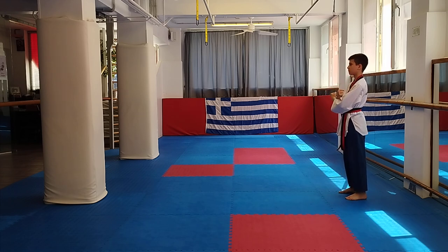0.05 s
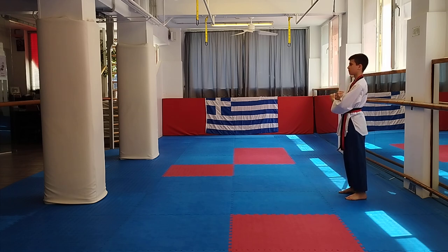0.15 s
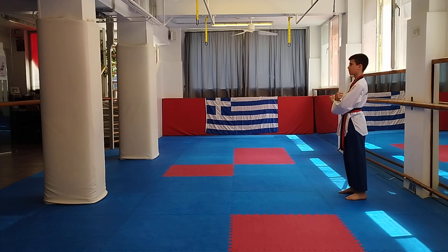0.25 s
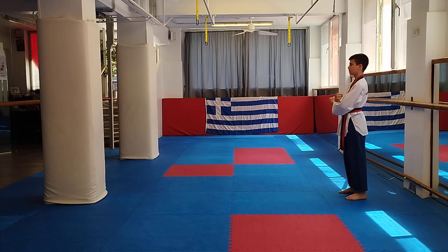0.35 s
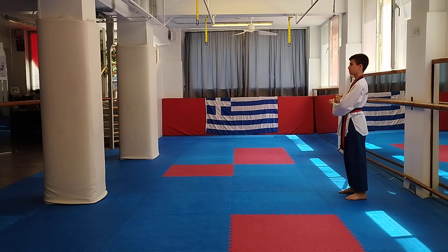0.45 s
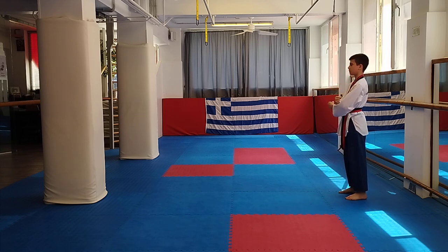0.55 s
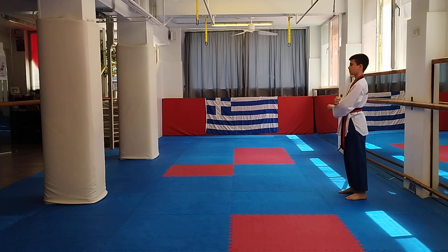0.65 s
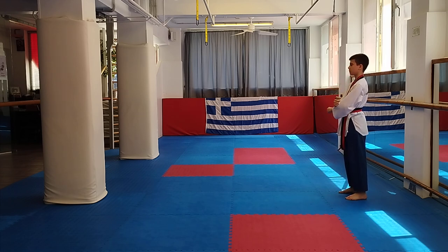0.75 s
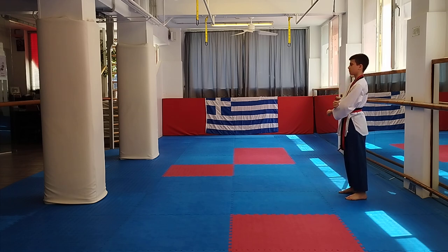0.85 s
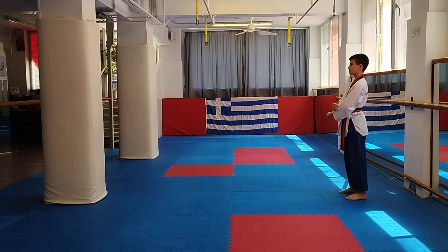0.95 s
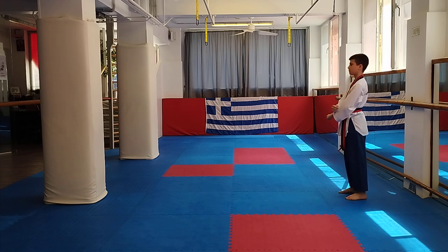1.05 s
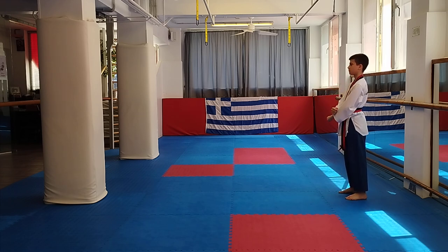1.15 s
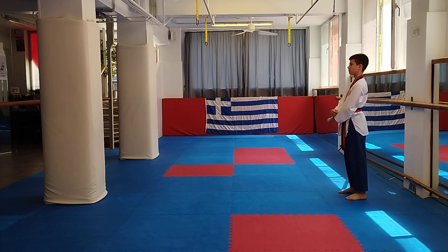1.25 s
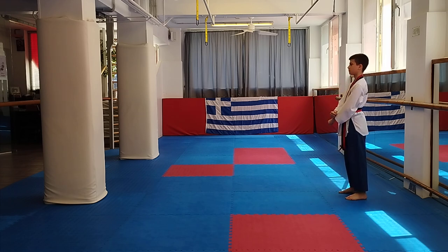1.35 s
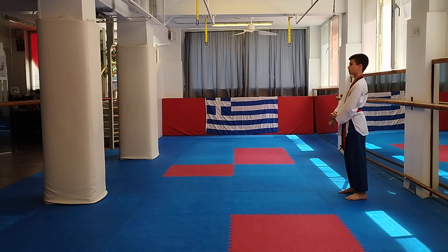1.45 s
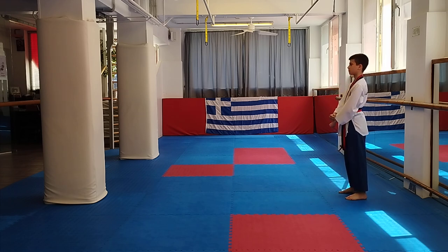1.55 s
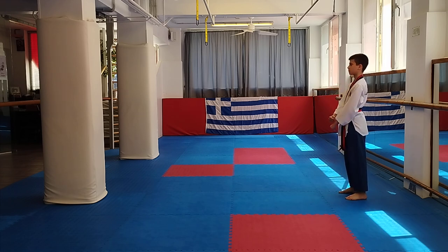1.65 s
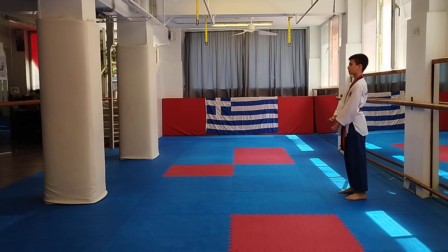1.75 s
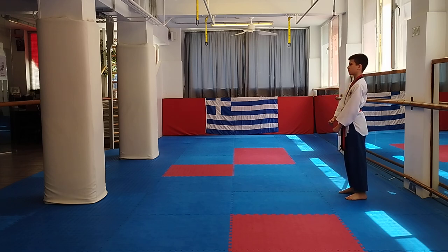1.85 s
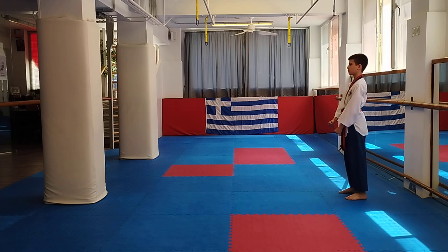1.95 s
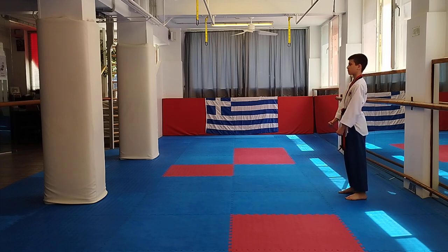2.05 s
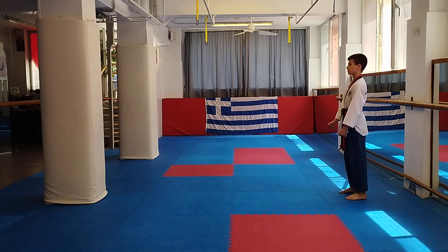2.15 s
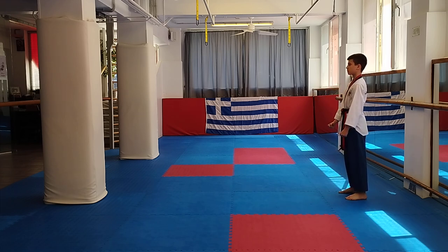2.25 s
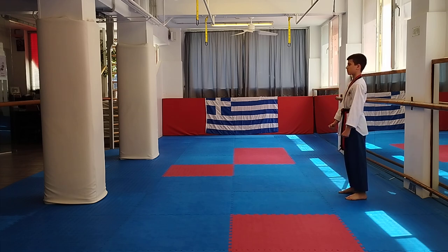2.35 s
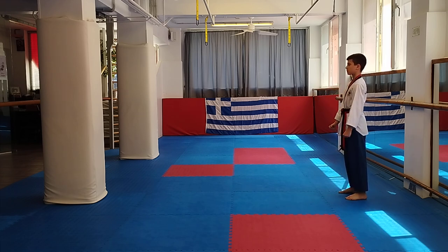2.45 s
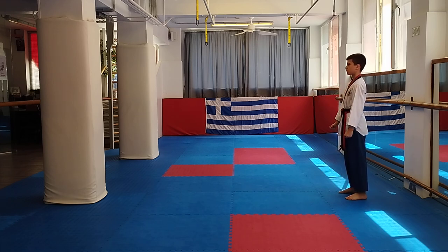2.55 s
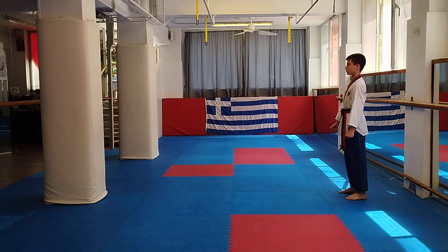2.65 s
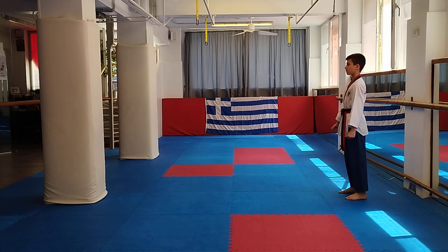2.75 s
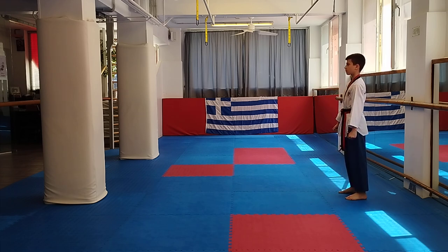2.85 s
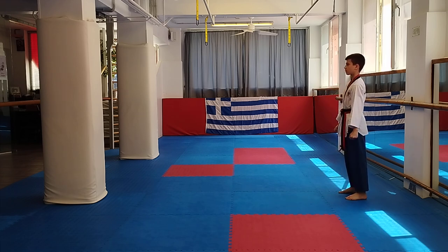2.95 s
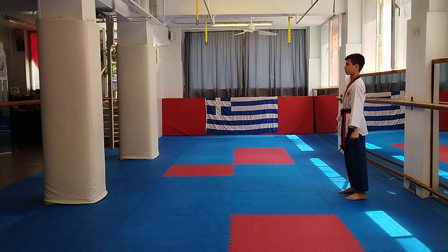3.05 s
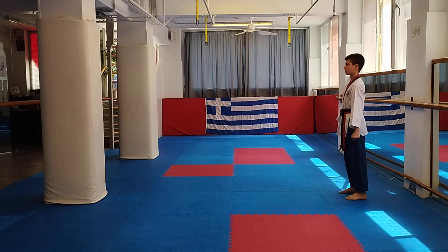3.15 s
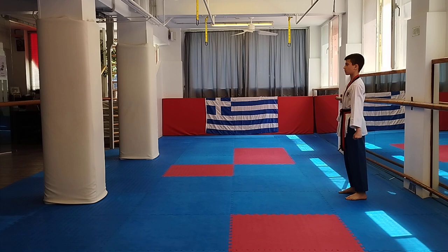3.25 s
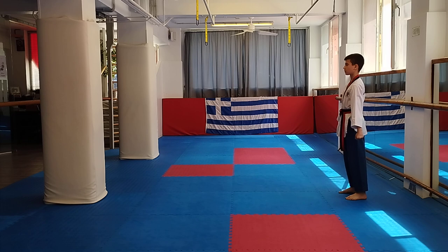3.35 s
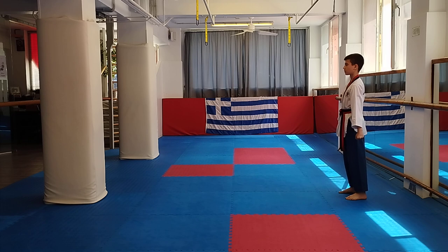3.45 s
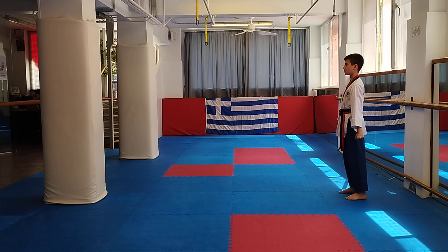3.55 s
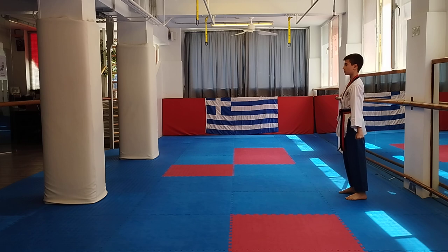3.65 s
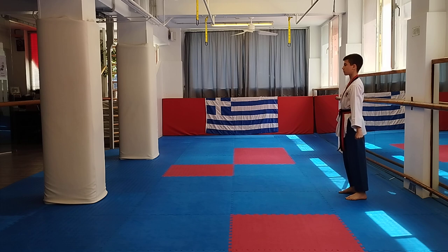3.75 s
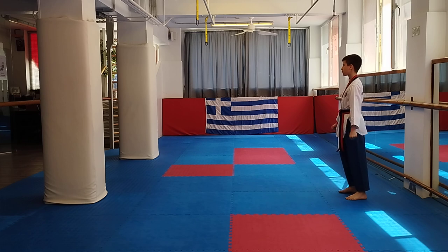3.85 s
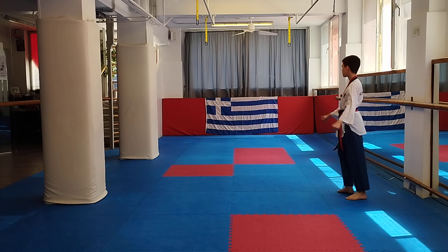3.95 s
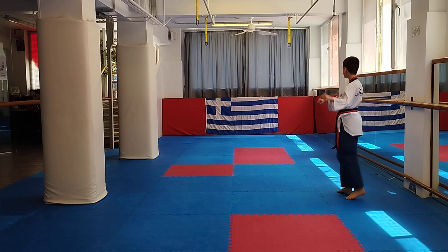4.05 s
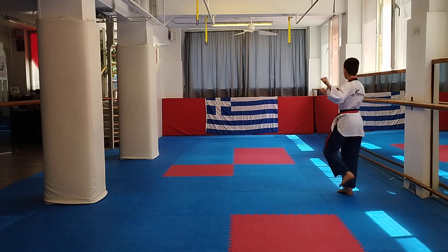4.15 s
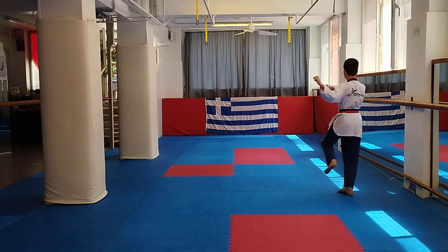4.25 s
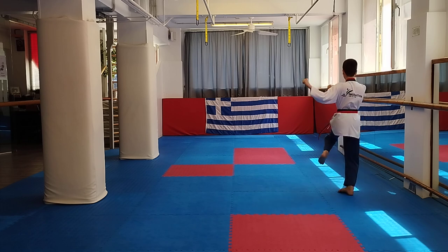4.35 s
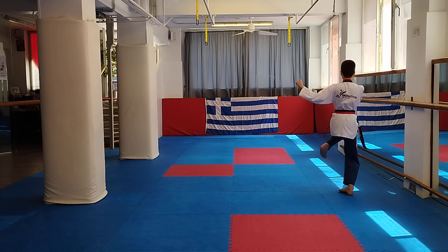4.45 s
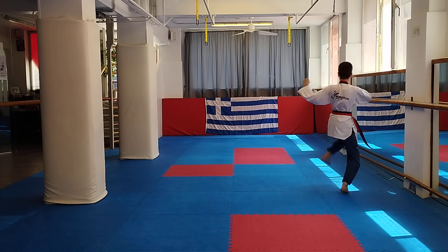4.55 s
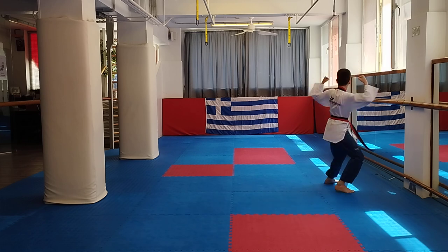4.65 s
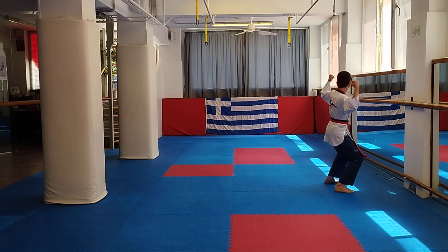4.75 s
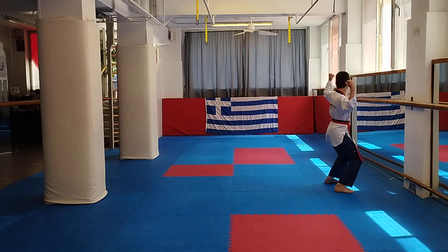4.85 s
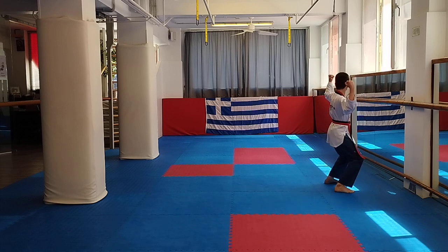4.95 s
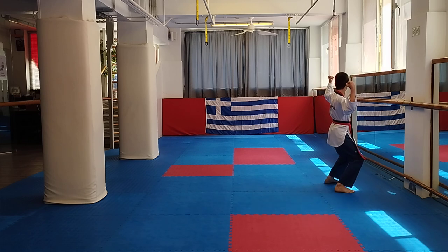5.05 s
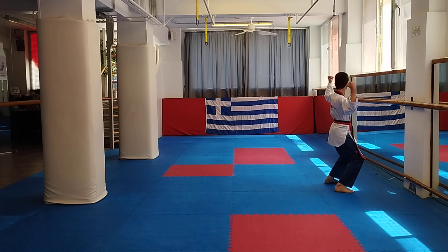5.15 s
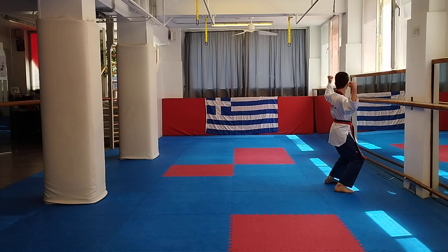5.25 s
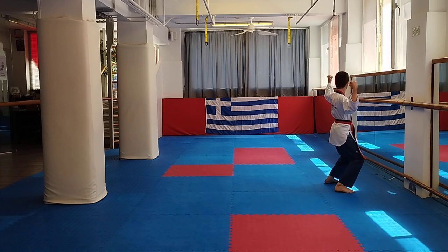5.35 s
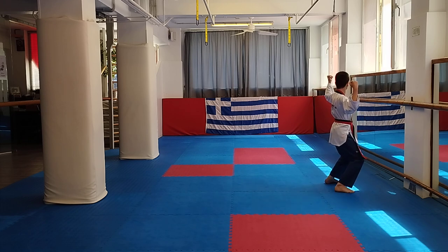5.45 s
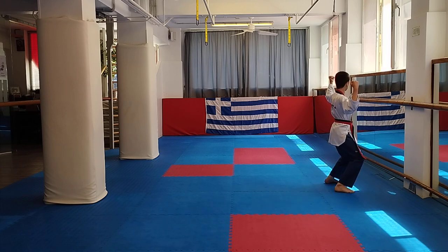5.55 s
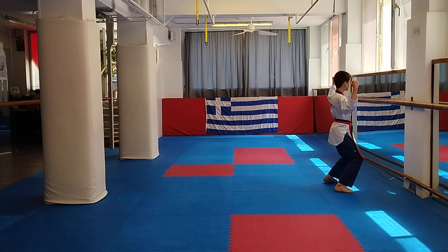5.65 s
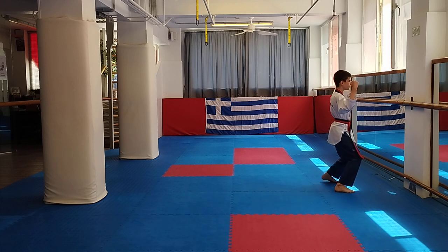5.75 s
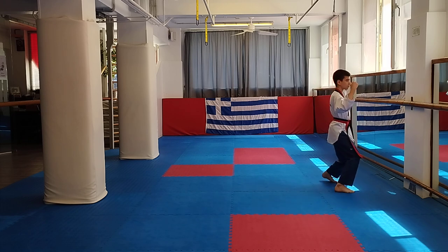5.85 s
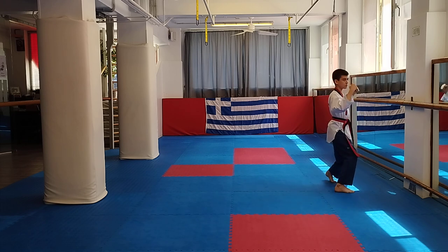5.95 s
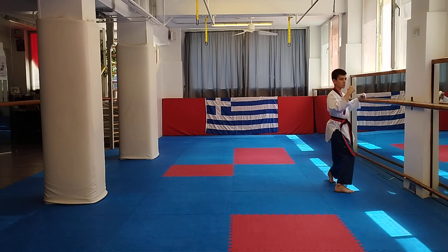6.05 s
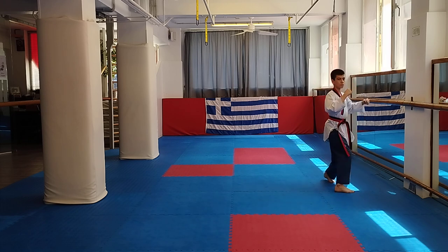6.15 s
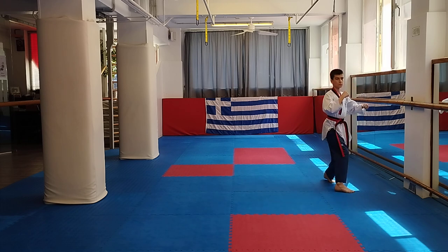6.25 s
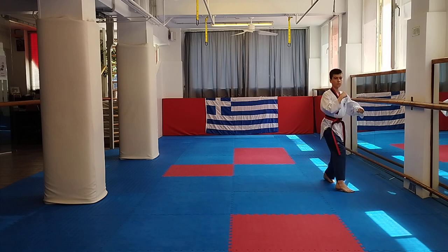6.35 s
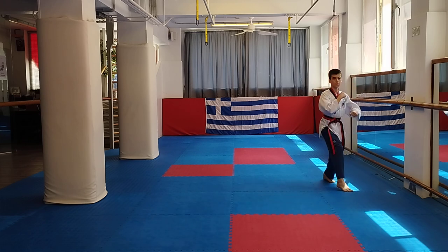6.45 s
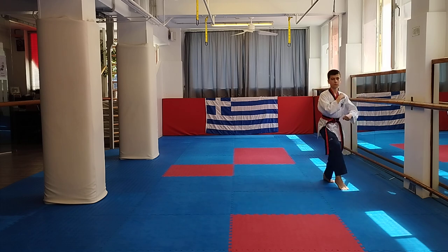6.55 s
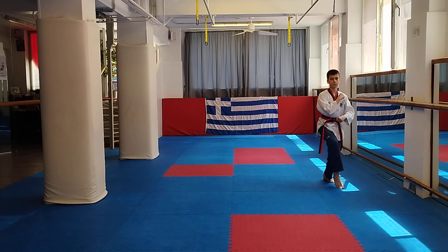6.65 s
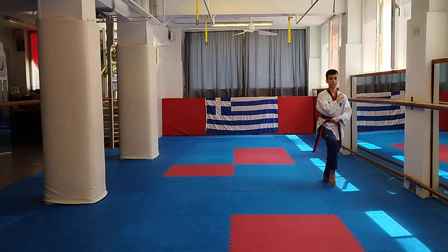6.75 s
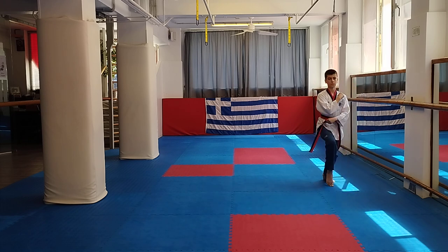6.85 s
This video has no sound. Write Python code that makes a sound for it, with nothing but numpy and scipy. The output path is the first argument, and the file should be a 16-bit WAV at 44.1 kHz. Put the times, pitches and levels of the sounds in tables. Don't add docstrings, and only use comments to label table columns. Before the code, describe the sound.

One hard barefoot stamp cracks and booms on training hall mats, over the low swelling rumble of a heavy vehicle passing outside.

```python
import sys
import numpy as np
from scipy import signal
from scipy.fft import rfft, irfft, next_fast_len
from scipy.io import wavfile
from scipy.ndimage import uniform_filter1d, map_coordinates

SR = 44100
rng = np.random.default_rng(int(sys.argv[2]) if len(sys.argv) > 2 else 0)


def gain_from_decibels(decibels):
    exponent = np.asarray(decibels, float) / 20
    return 10 ** exponent


def generate_wav(signal):
    frames = np.transpose(np.atleast_2d(signal))
    scaled = np.clip(frames, -1, 1) * 32767
    pcm = np.round(scaled).astype(np.int16)
    wavfile.write(sys.argv[1], SR, pcm)


N = 304157

# (frequency [Hz], left-right correlation [-1..1])
PORT_LIKENESS = [(30, 1), (60, 0.78), (130, 1), (290, 0.88), (640, 0.34), (1300, -0.33), (2400, 0.14),
                 (4000, -0.034)]


def unit(x):
    return x / np.sqrt(np.mean(x ** 2) + 1e-20)


def along(points, hz):
    f, v = np.transpose(points)
    return np.interp(np.log(hz + 1), np.log(f + 1), v)


def curves(rows):
    s, *cols = np.transpose(rows)
    return [np.interp(np.arange(N) / SR, s, c) for c in cols]


def wobble(rate_hz):
    knots = rng.standard_normal(int(N * rate_hz / SR) + 4)
    return map_coordinates(knots, [np.arange(N) * rate_hz / SR])


def fade(start_s, end_s, soft_s):
    t = np.arange(N) / SR
    return np.clip(np.minimum(t - start_s, end_s - t) / soft_s + 1, 0, 1) ** 2


def swells(rows):
    t = np.arange(N) / SR
    power = np.zeros(N)
    for start_s, db, rise_s, hold_s, t60_s in rows:
        decay_s = np.maximum(t - start_s - rise_s - hold_s, 0)
        rise = np.clip((t - start_s) / rise_s, 0, 1)
        power += (gain_from_decibels(db - 60 * decay_s / t60_s) * rise) ** 2
    return np.sqrt(power)


def filtered(x, response):
    m = next_fast_len(x.shape[-1] + 8192)
    return irfft(rfft(x, m) * response(np.fft.rfftfreq(m, 1 / SR)), m)[..., :x.shape[-1]]


def port_angle(hz):
    return np.arccos(np.clip(along(PORT_LIKENESS, hz), -1, 1)) / 2


def diffuse(pair):
    mid, side = filtered(pair, lambda hz: np.array([np.cos(port_angle(hz)), np.sin(port_angle(hz))]))
    return np.array([mid + side, mid - side])


def rush(spectrum, patchy_db):
    z = signal.stft(rng.standard_normal((2, N)), nperseg=512)[2]
    patches = uniform_filter1d(rng.standard_normal(z.shape[1:]), size=5, axis=0)
    patches = uniform_filter1d(patches, size=16, axis=1)
    pair = signal.istft(z * gain_from_decibels(patchy_db * unit(patches)), nperseg=512)[1][:, :N]
    both = diffuse(filtered(pair, lambda hz: gain_from_decibels(along(spectrum, hz))))
    return both / np.std(both.mean(0))


def line(hz, db, smear):
    gap = port_angle(np.mean(hz)) * np.sign(rng.normal())
    phase = 2 * np.pi * np.cumsum(hz * np.ones(N)) / SR
    phase = phase + smear * wobble(3) + rng.uniform(0, 7.6)
    return gain_from_decibels(db + 1.5) * np.sin(phase + np.array([[gap], [-gap]]))


def causal(spectrum):
    cepstrum = irfft(np.log(gain_from_decibels(along(spectrum, np.fft.rfftfreq(8192, 1 / SR))) + 1e-6))
    cepstrum[1:4096] *= 2
    cepstrum[4097:] = 0
    h = irfft(np.exp(rfft(cepstrum)))
    return h / np.linalg.norm(h)


def hall(x, early_db):
    # (frequency [Hz], t60 [s])
    hall_t60 = [(60, .6), (200, .62), (500, .8), (1500, 1.2), (4000, 1.05), (8000, .75), (13000, .55)]
    n = 3 * SR // 2
    hz, t, z = signal.stft(rng.standard_normal((2, n)), SR, nperseg=256)
    decay = gain_from_decibels(-60 * t / along(hall_t60, hz)[:, None])
    tail = diffuse(signal.istft(z * decay, SR, nperseg=256)[1])[:, :n]
    tail *= 1 - np.exp(-np.arange(tail.shape[1]) / SR / 0.001)
    tail /= np.linalg.norm(tail[0])
    tail[:, 0] = gain_from_decibels(early_db)
    return signal.fftconvolve(x[None], tail, axes=1)[:, :n]


def floor_ring(t, thud_db):
    # (frequency [Hz], level [dB], t60 [s])
    floor_modes = [(40.3, -10, 1), (78.6, -13, .6), (124.6, -16.5, 0.48), (156.9, -1, 0.55),
                   (202, -1.5, 0.56), (235.4, -5, 0.9), (280, -4.5, .9), (359, -11, 0.56), (420, -9, 0.46),
                   (443, -13.5, 0.75), (492, -7.5, 0.49), (516, -1, 0.36), (612, -8, .3), (860, -13.5, .08)]
    ring = np.zeros((2, len(t)))
    onset = 1 - np.exp(-t / 0.00045)
    for hz, db, t60_s in floor_modes:
        phase = rng.uniform(0, 7) + hz / 900 * rng.normal() * np.array([[.5], [-.5]])
        ring += gain_from_decibels(thud_db + db - 6.0 - 60 * t / t60_s) * np.sin(2 * np.pi * hz * t + phase) * onset
    return ring


def stamp():
    # (time [s], thud level [dB], slap level [dB])
    blows = [
        (4.7112, -21.5, -33.5),
        (4.717, -18, -25),
        (4.72, -13, -24),
        (4.731, -21, -33.5),
        (4.750, -19, -57),
        (4.783, -16.5, -55),
    ]
    # (frequency [Hz], level [dB/Hz])
    thud_colour = [(18, -49), (30, -17.5), (80, -1), (118, 0), (158, -3), (203, -1.5), (320, -13.5),
                   (430, -1), (540, -5), (650, -15), (850, -17), (1050, -21), (1400, -40), (2500, -120)]
    # (frequency [Hz], level [dB/Hz])
    slap_colour = [(500, -25), (800, -7.5), (1100, -10.5), (1500, -13.5), (2000, -13), (3000, -17.5),
                   (4800, -18.5), (6800, -23.5), (8000, -34), (10800, -36), (12500, -33), (15600, -35)]
    out, t = np.zeros((2, N)), np.arange(3 * SR // 2) / SR
    for s, thud_db, slap_db in blows:
        blow = -gain_from_decibels(thud_db + 30.0) * hall(causal(thud_colour), early_db=-6.5)
        blow += gain_from_decibels(slap_db + 26.5) * hall(causal(slap_colour), early_db=-37.5)
        crack = gain_from_decibels(slap_db + 3.5 - 60 * t[:900] / 0.014) * rng.standard_normal((2, 900))
        blow[:, :900] += signal.fftconvolve(crack, causal(slap_colour)[None], axes=1)[:, :900]
        blow += floor_ring(t, thud_db)
        out[:, round(s * SR):][:, :len(t)] += blow
    out[:, round(4.718 * SR):][:, :600] += sole_squeak(t[:600])
    return out


def sole_squeak(t):
    return gain_from_decibels(-21.5 - 60 * t / 0.021) * np.sin(2 * np.pi * 4500 * t) * (1 - np.exp(-t / 0.0012))


def swish():
    # (start [s], level [dB], rise [s], hold [s], t60 [s])
    strokes = [
        (0.284, -81.5, 0.009, 0.0069, .15),
        (3.396, -81, 0.14, 0.33, .6),
        (3.898, -82, 0.015, 0.036, 0.24),
        (4.105, -73.5, 0.032, 0.037, .3),
        (4.596, -75, .04, 0.085, 0.43),
        (5.9, -85, 0.039, 0.083, 0.61),
        (6.294, -73.5, 0.0099, 0.0093, 0.26),
        (6.502, -78, 0.06, .01, 0.26),
        (6.545, -70, .03, 0.17, .9),
    ]
    # (frequency [Hz], level [dB/Hz])
    cloth_colour = [(1470, -43), (2500, -6), (3620, -1), (4390, 1), (5800, -7), (6260, -3.5), (8140, -16),
                    (9210, -13.5), (11000, -16.5), (12800, -8), (15800, -8.5)]
    return swells(strokes) * gain_from_decibels(.5 * wobble(40)) * rush(cloth_colour, patchy_db=.6) * gain_from_decibels(9.5)


def boom_db(hz):
    # (centre [Hz], half width [Hz], gain [dB])
    booms = [(28.76, 4.4, 34), (51.2, 4.2, 13), (84.8, 2.6, 18.5), (120, 16.5, 12), (123.15, 1.35, 7),
             (156.6, 3.2, 4), (165.82, 2.35, 7), (172.7, 68.3, 21.5), (176.2, 1.38, -9), (183.2, 5.5, 9),
             (195.9, 6.1, 6), (238.3, 1.8, 9.5), (330, 25, 7.5), (492, 65, 7)]
    return sum(db / (1 + ((hz - centre_hz) / width_hz) ** 2) for centre_hz, width_hz, db in booms)


def engine():
    # (time [s], firing rate [Hz], level of each multiple [dB])
    firing = [(2.4, 29.4, -71.5), (2.53, 28.49, -80), (2.65, 29.99, -69.5), (2.86, 29.98, -67.5),
              (3.19, 29.86, -66), (3.72, 29, -65.5), (3.97, 27.81, -69.5), (4.15, 26.42, -68.5),
              (4.33, 26.01, -66), (4.65, 24.13, -66), (4.98, 23.49, -62), (5.57, 23.87, -66.5),
              (5.83, 24.34, -65.5), (5.98, 23.98, -69.5), (6.55, 24.67, -70), (6.9, 24.74, -69.5)]
    dull_db_per_hz, dull_from, full_load_hz = .13, 8, 29
    hz, level_db = curves(firing)
    out = line(hz, level_db + boom_db(hz), smear=.05)
    for k in range(2, 23):
        dull_db = dull_db_per_hz * max(k - dull_from, 0) * (hz - full_load_hz)
        waver_db = (0.9 + 0.1927 * min(k, 12)) * wobble(3)
        out = out + line(k * hz, level_db + dull_db + boom_db(k * hz) + waver_db, smear=.07 * k)
    return fade(2.5, 7, .2) * out


def road():
    # (time [s], level [dB])
    tyre_level = [(0, -68), (.9, -70), (1.4, -65), (1.75, -62), (2.3, -58), (2.85, -50), (3.4, -49.5),
                  (3.75, -46.5), (4.3, -51.5), (5.2, -52), (5.95, -52), (6.3, -53.5), (6.9, -55.5)]
    # (start [s], level [dB], rise [s], hold [s], t60 [s])
    shakes = [
        (-.5, -43, 0.12, 1.7, 27),
        (.75, -37, 1.56, .25, 1),
        (3.55, -40.5, 0.5, 1.23, 3.3),
        (5.3, -45, .3, 0.68, 3.7),
    ]
    # (frequency [Hz], level [dB/Hz])
    rumble_colour = [(12, -35.5), (20, -3.5), (41, -5), (64, -7), (91, -7.5), (113, -1), (161, 0),
                     (182, -13.5), (211, -6), (239, -20), (300, -15), (390, -49), (660, -120)]
    # (frequency [Hz], level [dB/Hz])
    roar_colour = [(150, -12), (250, -2.5), (292, -12), (356, -2), (456, -6), (687, -14), (891, -18.5),
                   (1100, -22.5), (1430, -30), (2420, -120)]
    # (frequency [Hz], level [dB/Hz])
    hiss_colour = [(530, -27), (900, -6), (1100, 2.5), (1510, -0.5), (1780, 0), (2620, -4.5), (2950, -8.5),
                   (4230, -8.5), (6430, -19), (8170, -36.5), (9660, -30.5), (11000, -42), (13200, -29.5),
                   (15800, -49.5)]
    nearest_db, roar_db, roar_follows = -49, -47, 0.68
    hiss_db, = curves(tyre_level)
    rumble = np.hypot(swells(shakes), gain_from_decibels(-60.5))
    tyre_roar = gain_from_decibels(roar_db + roar_follows * (hiss_db - nearest_db))
    roar = np.hypot(tyre_roar, gain_from_decibels(-16) * rumble)
    swell = wobble(2.53)
    x = rumble * gain_from_decibels(.5 * swell) * rush(rumble_colour, patchy_db=0.5)
    x += roar * gain_from_decibels(0.2 * swell) * rush(roar_colour, patchy_db=1.5)
    x += gain_from_decibels(hiss_db - 2.5 + 0.14 * swell) * rush(hiss_colour, patchy_db=1.02)
    return x


def far_engine():
    # (time [s], frequency [Hz])
    far_firing = [(.9, 28.7), (1.46, 41.14), (2.5, 42)]
    drone_start_s = 1.17
    since_s = np.arange(N) / SR - drone_start_s
    firing = fade(1.0, 2.0, .2) * line(curves(far_firing)[0], -50 + 1.8 * wobble(5.2), smear=.3)
    drone_hz = 216 - 10 * since_s
    drone_db = -47 - 8 * since_s + 2.6 * wobble(3.7)
    return firing + fade(drone_start_s, 2.2, 0.12) * line(drone_hz, drone_db, smear=.35)


def far_tyres():
    # (start [s], level [dB], rise [s], hold [s], t60 [s])
    far_swell = [
        (1.35, -65.5, .35, .5, 2.8),
    ]
    # (frequency [Hz], level [dB/Hz])
    gap_colour = [(800, -38.5), (1090, 3.5), (1450, -23), (1900, -1), (2200, -21), (2500, -1),
                  (2900, -43.5)]
    return swells(far_swell) * rush(gap_colour, patchy_db=-0.5)


def whine():
    # (time [s], level [dB])
    whine_level = [(0, -67.5), (.8, -69), (1, -72), (1.8, -69), (2.4, -103)]
    return line(1966, curves(whine_level)[0] + .5 * wobble(6), smear=.5)


def tinkles():
    # (start [s], frequency [Hz], level [dB], length [s])
    far_tones = [
        (0.182, 5630, -81, .06),
        (.32, 5500, -86, .1),
        (0.663, 893, -62, 0.044),
    ]
    return sum(fade(s, s + length_s, 0.018) * line(hz, db, smear=0.35)
               for s, hz, db, length_s in far_tones)


def idle_hall():
    # (frequency [Hz], level [dB/Hz])
    idle_colour = [(700, -23), (1000, -10.5), (1400, -15.5), (1900, -17), (2300, -23.5), (5400, -34.5),
                   (7500, -39.5), (10500, -43.5), (12500, -41.5), (15600, -36)]
    return gain_from_decibels(-68.5) * rush(idle_colour, patchy_db=-3.5)


def scene():
    inside = stamp() + swish()
    outside = engine() + road() + far_engine() + far_tyres()
    return inside + outside + whine() + tinkles() + idle_hall()


def roll_off(x):
    return signal.sosfilt(signal.butter(12, 16470, fs=SR, output="sos"), x)


def record(dry):
    # (frequency [Hz], left minus right [dB])
    port_tilt = [(100, -.7), (500, .3), (2000, -1), (4500, -2.6), (8500, -3), (10500, 1), (12000, 6.5),
                 (14500, 7)]
    x = filtered(dry, lambda hz: gain_from_decibels(np.array([[.5], [-.5]]) * along(port_tilt, hz)) * (hz < 15730))
    x = x / (1 + np.abs(x / .9) ** 4) ** (1 / 4)
    return roll_off(x)


dry = scene()
out = record(dry)
generate_wav(out)
```